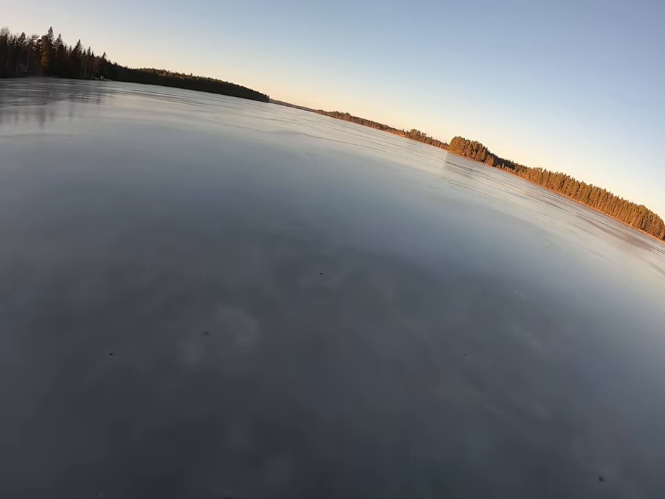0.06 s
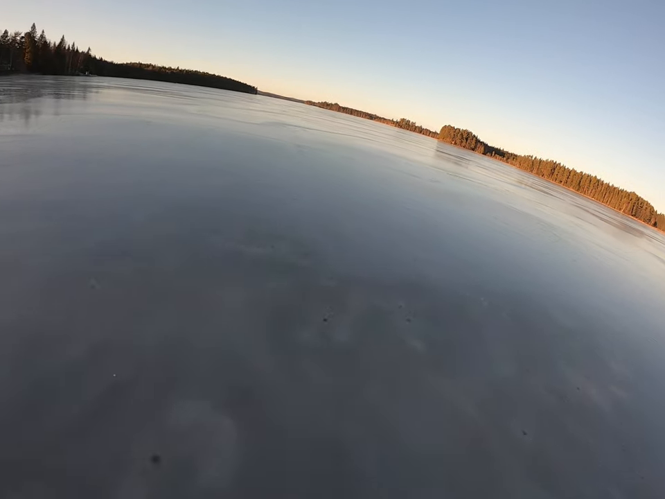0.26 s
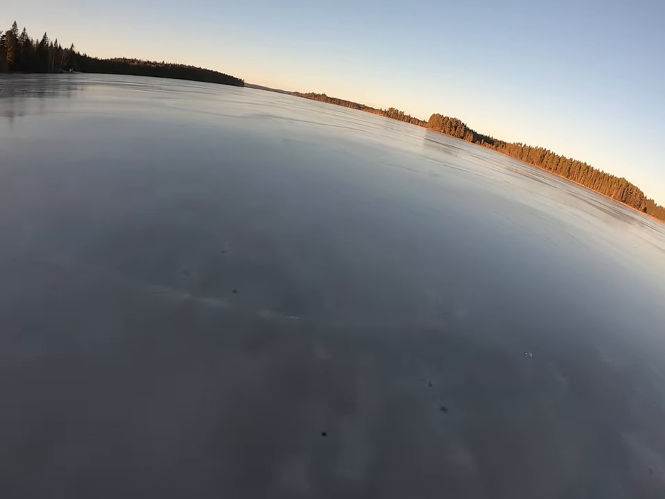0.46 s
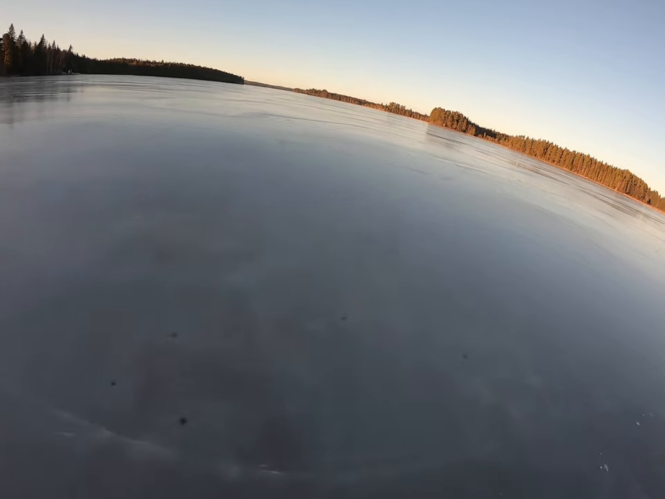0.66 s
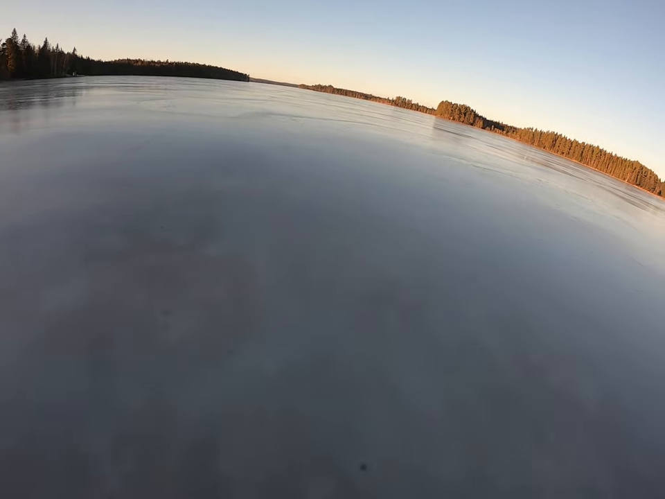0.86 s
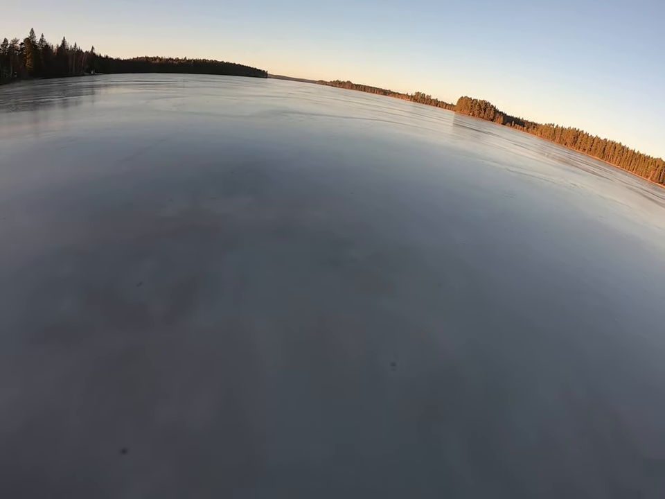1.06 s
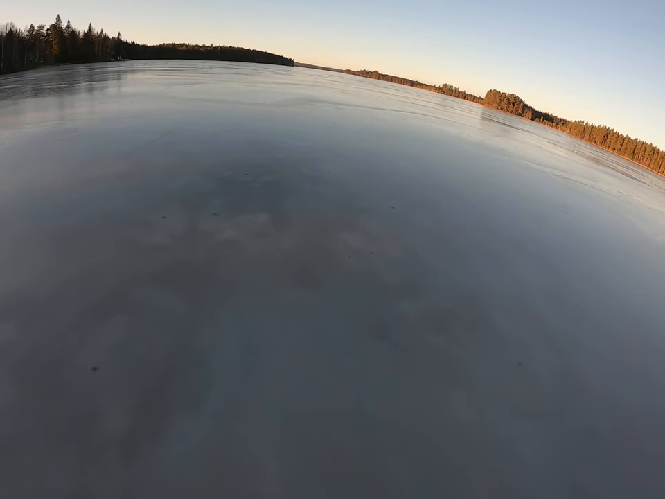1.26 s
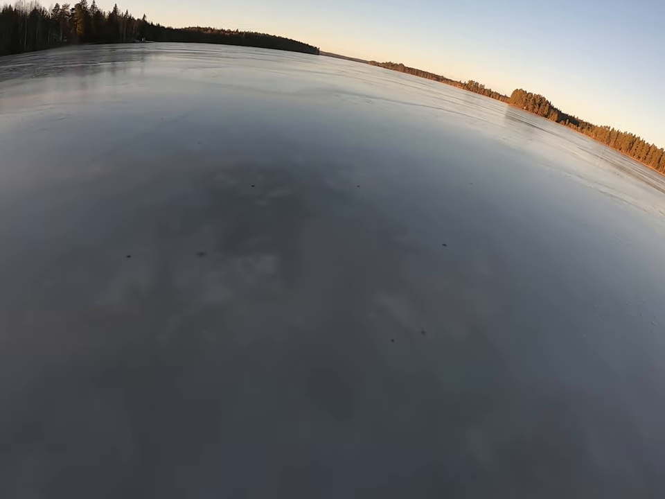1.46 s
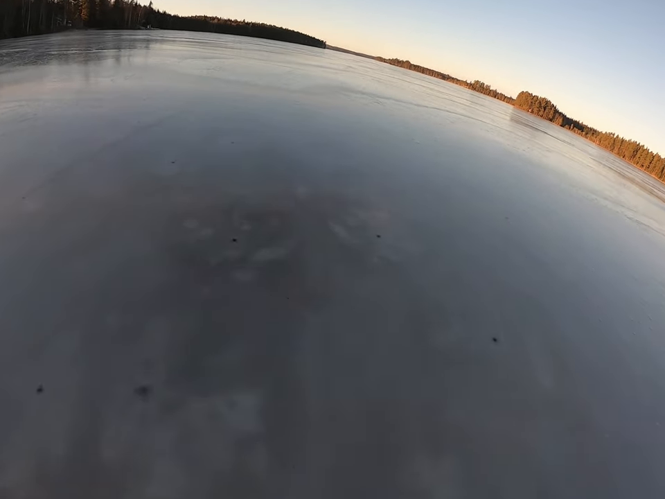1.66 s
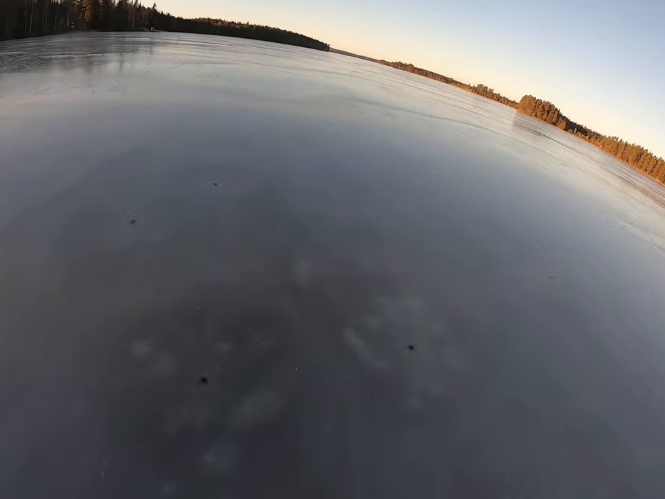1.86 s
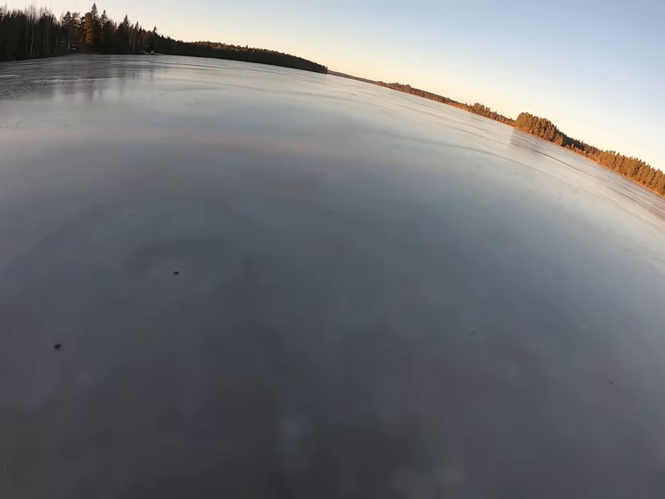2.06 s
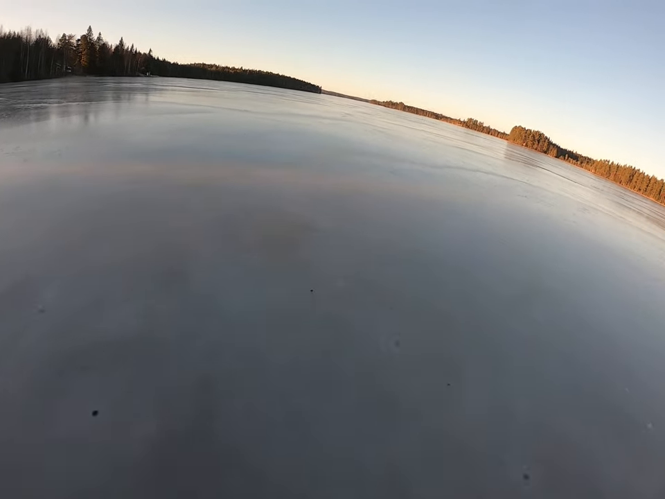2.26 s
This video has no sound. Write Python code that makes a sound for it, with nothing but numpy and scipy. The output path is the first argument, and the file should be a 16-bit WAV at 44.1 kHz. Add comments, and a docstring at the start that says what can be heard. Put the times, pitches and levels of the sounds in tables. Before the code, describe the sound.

Ice skates clack down and glide over lake ice in two scraping, rumbling strokes.

```python
"""Two skating strokes on the bare ice of a lake, heard from the skater's body.
Over faint air and low wind a binding rattles; then the first blade clacks down and glides, driving
the ice into a rumble and a hollow roar while its edge scrapes and cracks off brittle chips.
After this stroke a lifted blade snaps back against its boot and its spring rings.
The second stroke follows with a thin singing, further knocks and rattling bindings."""
import sys
import numpy as np
from scipy import signal
from scipy.fft import rfft, irfft, next_fast_len
from scipy.io import wavfile
from scipy.ndimage import map_coordinates

SR = 44100
rng = np.random.default_rng(int(sys.argv[2]) if len(sys.argv) > 2 else 0)


def dump_mix(stems):
    """Bounce the given channels to the path in sys.argv[1] as a 16-bit WAV at rate SR."""
    frames = np.atleast_2d(stems).T  # one column per channel
    limited = np.clip(frames, -1, 1)  # hard clip at full scale
    pcm = np.round(limited * 32767).astype(np.int16)
    wavfile.write(sys.argv[1], SR, pcm)


N = 102047

# Envelopes of the background air and the wind's buffeting (t/s, level/dB)
AIR_ENVELOPE = [(0, -46), (.2, -46.5), (.31, -48), (1.22, -47), (1.27, -47.5), (1.39, -48.5), (1.5, -45),
                (2.3, -41.5)]
WIND_ENVELOPE = [(0.0, -39.5), (0.2, -54), (0.24, -48), (0.84, -30), (0.97, -41), (1.48, -36.5),
                 (1.49, -29), (2.05, -50), (2.15, -49), (2.31, -46)]
# Envelopes of the edge's scrape in each stroke and of the blade's singing (t/s, level/dB)
FIRST_SCRAPE_ENVELOPE = [(.33, -48), (.385, -37), (.415, -30.5), (.45, -42.5), (.55, -43), (.66, -35),
                         (.72, -36), (.86, -40), (.98, -44), (1.05, -46.5), (1.2, -48.5)]
SECOND_SCRAPE_ENVELOPE = [(1.39, -66), (1.435, -32), (1.48, -52), (1.53, -45), (1.6, -38.5), (1.66, -34),
                          (1.76, -52), (1.88, -45), (1.91, -60), (2.02, -47.5), (2.07, -42), (2.15, -40.5),
                          (2.2, -60), (2.24, -32.5), (2.27, -60), (2.31, -57)]
SING_ENVELOPE = [(1.5, -65), (1.66, -44), (1.74, -45.5), (1.81, -38.5), (1.9, -44), (2.0, -57), (2.2, -65)]
# Envelopes of the ice's rumble and the gliding blade's roar (t/s, relative level/dB)
RUMBLE_ENVELOPE = [(0.0, -32.5), (0.07, -56), (0.17, -45.5), (0.29, -57.5), (0.34, -36.5), (0.4, -29.5),
                   (1.13, -33.5), (1.19, -42.5), (1.42, -45), (1.46, -34.5), (1.67, -29), (2.25, -32.5),
                   (2.31, -64)]
ROAR_ENVELOPE = [(0.11, -71), (0.15, -48), (0.19, -73), (0.33, -56.5), (0.42, -29.5), (0.48, -28),
                 (0.54, -31), (0.66, -28), (0.74, -31.5), (0.88, -29), (0.95, -26), (1.02, -27.5),
                 (1.13, -28.5), (1.18, -44.5), (1.38, -59), (1.49, -32.5), (1.66, -31.5), (1.77, -37.5),
                 (1.94, -39.5), (2.06, -39), (2.23, -30), (2.31, -66)]
# Cutoff of the roar, which climbs as a blade bites or pushes off (t/s, f/Hz)
ROAR_CUTOFF = [(.36, 1350), (.47, 1450), (.6, 1120), (.75, 725), (.92, 583), (1.05, 870), (1.14, 944),
               (1.3, 900), (1.5, 620), (1.62, 554), (1.8, 377), (2.02, 360), (2.14, 556), (2.22, 910)]

# Binding rattles (t/s, level/dB, contact time/s, ring f/Hz, low knock/dB, treble/dB)
RATTLE_HITS = [(0.037, -29, 0.0034, 2560, 5, 10.5), (0.062, -36, .002, 2230, -9, -10),
               (0.07, -33, 0.0034, 2080, -2, 6), (0.084, -33, 0.003, 2490, 0, 14),
               (0.117, -39, 0.0028, 2180, -14, 4), (0.128, -33, 0.0096, 2140, -5, 5),
               (0.149, -27, 0.003, 2580, 5, 5.5), (.16, -26, 0.0046, 2080, 2, 9),
               (0.236, -39.5, 0.002, 2250, 12, 18.5), (1.459, -27.5, 0.017, 2500, -20, -14),
               (1.486, -22, 0.0013, 2366, -18.5, -16), (1.5163, -29, 0.0015, 2150, 1.5, -3),
               (1.537, -32.5, 0.0009, 2430, -6, 4), (1.5538, -28.5, 0.0012, 2140, -14, -2.5),
               (1.584, -26, 0.0022, 2620, -1, 1.5), (1.61, -28.5, 0.002, 2260, -6, 2),
               (1.6282, -20.5, 0.0015, 2290, 1, 2), (1.709, -22, 0.00093, 2376, 6.5, 2.5),
               (1.7125, -19, 0.0031, 2516, 4.5, -2.5), (1.731, -23.5, 0.0019, 2350, 6, 2.5),
               (1.823, -27.5, 0.0016, 2200, 11, -3), (1.828, -26, 0.0017, 2120, 11, 0.5),
               (1.847, -32, 0.0018, 2550, 20, 13), (1.924, -39.5, 0.0018, 2550, 7, 19),
               (1.952, -27, 0.0012, 2510, 13.5, -2), (1.9579, -30.5, 0.0015, 2460, 14, -3),
               (1.97, -33, 0.00076, 2760, 4, -11), (1.986, -31, 0.0015, 2600, 6.5, 8.5),
               (2.026, -30, 0.0027, 2510, 14, 12), (2.0535, -18, 0.0029, 2410, 2, -6),
               (2.096, -31, 0.0027, 2070, 7, 14.5), (2.128, -21.5, 0.0027, 2546, 7.5, -4),
               (2.146, -26.5, 0.0026, 2120, -10, -4), (2.286, -32.5, 0.0036, 2660, 0, 9.5)]
# Share of a rattle's treble gain that acts at each frequency (f/Hz, share/1)
TREBLE_SHARE = [(2600, 0.046), (5500, 0.95)]
# Ice chips cracking under the edge (t/s, level/dB, f/Hz)
CHIP_CRACKS = [(0.422, -30, 2470), (0.516, -32, 2330), (0.539, -29.5, 2430), (0.5713, -22, 2430),
               (.573, -25, 1200), (0.576, -27, 3000), (.601, -29, 2400), (0.665, -18.5, 3980),
               (0.766, -33.5, 2860), (.789, -30, 2870), (0.833, -31.5, 3830), (0.875, -27.5, 3680),
               (0.9, -34, 3330), (0.913, -31, 3070), (0.946, -33.5, 3250), (0.97, -31, 3660),
               (0.9843, -25.5, 3860), (1.019, -36.5, 3380), (1.08, -39.5, 3260)]
# Snaps of the lifted blade against the boot (t/s, level/dB, ring f/Hz)
SNAP_HITS = [(1.2675, -34, 2080), (1.278, -18, 2000), (1.361, -17.5, 2480), (1.4004, -39, 2400),
             (1.4142, -31, 2500)]
# Swells of the spring's ring around the snaps (t/s, level/dB, Gaussian width/s)
SPRING_SWELLS = [(1.26, -37, 0.0026), (1.27, -28, 0.002), (1.28, -30, 0.0038), (1.3415, -37, 0.0019),
                 (1.352, -28, 0.0016), (1.362, -25, 0.0029), (1.402, -35.5, 0.0018)]
# A blade landing or knocking on a bump (t/s, level/dB, ring f/Hz, contact time/s)
CLACK_HITS = [(0.2706, -14.5, 2130, 0.0022), (0.272, -21.5, 3130, 0.003), (0.343, -14.5, 1590, 0.0022),
              (0.348, -24, 1500, 0.0063), (.372, -16, 1965, 0.00056), (0.3739, -18, 1364, 0.00092),
              (0.385, -21.5, 1900, 0.0011), (0.386, -18, 1360, 0.005), (.393, -33, 2940, 0.001),
              (0.412, -23, 1360, 0.0054), (0.4619, -26.5, 2240, 0.0028), (1.6445, -18, 1630, 0.0016),
              (1.6474, -17, 1500, 0.0058), (2.175, -20.5, 1680, 0.0038), (2.218, -26.5, 1730, 0.0032),
              (2.226, -25.5, 2010, 0.0066)]
# Normal modes of the steel blade (f/Hz, relative level/dB)
STEEL_MODES = [(3120, 6), (3740, 4), (4050, 0), (4600, -2.5), (5520, -10.5), (7550, -15), (8400, -13.5),
               (9200, -14.5)]

# Spectra of the sustained noises (f/Hz, relative level/dB)
AIR_SPECTRUM = [(20, 6.5), (70, 6.5), (150, 1.5), (350, -16), (650, -17.5), (1200, -17.5), (2200, -30),
                (3600, -46), (5000, -44), (6200, -25.5), (8000, -52), (9800, -32), (11300, -52),
                (15000, -66)]
WIND_SPECTRUM = [(15, -5.5), (30, -8), (60, 1.5), (95, -4), (170, -17), (600, -74)]
FIRST_SCRAPE_SPECTRUM = [(400, -12), (1200, 8), (1900, 0), (2400, 7.5), (3000, 3.5), (3800, 3.5),
                         (5000, -5.5), (6500, -13), (8200, -18), (9600, -20), (11500, -36), (15000, -54)]
SECOND_SCRAPE_SPECTRUM = [(400, -24), (900, -6), (1500, -9.5), (2000, -2.5), (2400, -4), (3000, -6),
                          (3700, -19), (4700, -23), (6500, -33), (8400, -34), (9500, -30.5), (11200, -52),
                          (15000, -57)]
SING_SPECTRUM = [(700, -26), (1150, -6), (1400, 23), (1650, 18), (2000, 19.5), (2500, -34), (4000, -32),
                 (12000, -76)]
RUMBLE_SPECTRUM = [(40, -11), (80, -5), (120, -1.5), (200, -1.5), (300, -6), (480, -22), (1200, -69)]
ROAR_SPECTRUM = [(30, -52), (90, -25), (150, -13), (250, -0.5), (350, 0), (500, -1), (700, -3.5),
                 (1500, -4), (5000, -7), (15000, -39)]
# Tone colours of the rattles, chips, snaps and clacks, most with a thin microphone resonance
# near 9.5 kHz (f/Hz, relative level/dB)
RATTLE_COLOUR = [(300, -22), (650, -18), (1000, -5.5), (1500, -8.5), (1900, -8), (2500, -2.5), (2900, -10),
                 (3300, -5.5), (4200, -23), (5000, -17.5), (7500, -36), (8600, -46.5), (9600, -34),
                 (11300, -51), (15000, -67)]
CHIP_COLOUR = [(500, -13), (1050, -6.5), (1700, -9.5), (2600, 2), (4000, -2.5), (5200, -9.5), (7200, -33.5),
               (9500, -25), (11500, -47), (15000, -65)]
SNAP_COLOUR = [(400, -35), (650, -22.5), (950, -8), (1250, -14), (1900, 6), (2700, 6), (3500, -3.5),
               (4600, -12.5), (7000, -44), (8650, -22), (10000, -42), (12000, -67)]
CLACK_COLOUR = [(300, -19.5), (700, -19.5), (1050, -28), (1400, 2), (2000, -4.5), (2600, -1.5),
                (3200, -6.5), (4200, -16), (5500, -22), (7000, -23.5), (8400, -42), (9400, -30),
                (11300, -56), (15000, -57)]

HIT_T = np.arange(4096) / SR  # time axis of one impact
HIT_HZ = np.fft.rfftfreq(len(HIT_T), 1 / SR)
TOP_HZ = 15300


def amp(db):
    """Amplitude ratio of a level in decibels."""
    return 10 ** (np.asarray(db) / 20)


def unit(x):
    """Normalisation to rms 1."""
    return x / np.sqrt(np.mean(x ** 2) + 1e-20)


def unit_hit(x):
    """Normalisation of an impact to the energy of 5 ms at rms 1."""
    return unit(x) * np.sqrt(.005 * SR / len(HIT_T))


def along(points, hz):
    """Interpolation of (f/Hz, value) points on a logarithmic frequency axis."""
    f, values = np.transpose(points)
    return np.interp(np.log(hz + 1), np.log(f + 1), values)


def curve(points):
    """Linear interpolation of (t/s, value) points at every sample."""
    return np.interp(np.arange(N) / SR, *np.transpose(points))


def wobble(knots_per_s):
    """Smooth random modulation: a spline through Gaussian values."""
    return map_coordinates(rng.standard_normal(4096), [np.arange(N) * knots_per_s / SR], mode="wrap")


def filtered(x, response):
    """Linear filtering: the spectrum is multiplied by a frequency response."""
    size = next_fast_len(N + SR // 2)
    return irfft(rfft(x, size) * response(np.fft.rfftfreq(size, 1 / SR)), size)[:N]


def noise(spectrum, grain_db=0):
    """Source and filter: white noise in millisecond grains is shaped by a spectrum; rms 1."""
    drive = rng.standard_normal(N) * amp(grain_db * wobble(700))
    return unit(filtered(drive, lambda hz: amp(along(spectrum, hz))))


def resonance(centre_hz, half_width_hz):
    """Lorentzian outline of a resonance, 1 at its centre."""
    return 1 / (1 + ((HIT_HZ - centre_hz) / half_width_hz) ** 2)


def hardness_db(db):
    """Harder contacts excite more treble: the top octave rises with level above -25 dB."""
    return max(db + 25, 0) * resonance(13000, 2600)


def contact(colour_db, contact_s, click, tail_db, tail_s):
    """Impact excitation: an impulse, a gritty burst and a faint tail drive a minimum-phase filter."""
    size = len(HIT_T)
    cepstrum = irfft(np.log(amp(colour_db)))
    cepstrum[1:size // 2] *= 2  # folding the cepstrum makes the response causal
    cepstrum[size // 2 + 1:] = 0
    response = np.exp(rfft(cepstrum))

    def ring(drive):
        """Forced response of the filter, rms 1."""
        return unit(irfft(rfft(drive) * response))

    grit = rng.standard_normal((2, size))
    age = HIT_T / contact_s
    impulse = ring(1. * (HIT_T == 0))
    crunch = ring(grit[0] * age * np.exp(-1.5 * age))
    tail = ring(grit[1] * (1 - np.exp(-age)) * np.exp(-HIT_T / tail_s))
    return unit_hit(unit(click * impulse + crunch) + amp(tail_db) * tail)


def ping(hz, decay_s):
    """Damped oscillation: one struck mode builds up quickly and decays exponentially."""
    attack = 1 - np.exp(-HIT_T / 0.0009)
    return unit_hit(np.sin(2 * np.pi * hz * HIT_T) * attack * np.exp(-HIT_T / decay_s))


def steel(decay_cycles=28, spread_db=4, detune=.008):
    """Modal superposition: each contact point favours different modes of the blade."""
    ring = np.zeros(len(HIT_T))
    for hz, db in STEEL_MODES:
        strength, shift = rng.standard_normal(2)
        ring += amp(db + spread_db * strength) * ping(hz * (1 + detune * shift), decay_cycles / hz)
    return unit_hit(ring)


def add(track, start_s, sound):
    """Superposition of a sound on the track."""
    part = track[max(round(start_s * SR), 0):][:len(sound)]
    part += sound[:len(part)]


def air():
    """Ambient noise: a faint broadband rush whose level wavers."""
    return amp(curve(AIR_ENVELOPE) + 1.3 * wobble(32)) * noise(AIR_SPECTRUM, grain_db=4.0)


def wind():
    """Turbulent pressure fluctuations: wind buffets the microphone at low frequencies."""
    return amp(curve(WIND_ENVELOPE)) * noise(WIND_SPECTRUM)


def rattles():
    """Impacts across a clearance: play in the bindings gives chatter and a ring over a lower knock."""
    out = np.zeros(N)
    for start_s, db, contact_s, hz, knock_db, treble_db in RATTLE_HITS:
        colour_db = along(RATTLE_COLOUR, HIT_HZ) + 8 * resonance(hz, 210) + hardness_db(db)
        colour_db += knock_db * resonance(960, 340) + treble_db * along(TREBLE_SHARE, HIT_HZ)
        chatter = contact(colour_db, contact_s, click=0.24, tail_db=-10, tail_s=0.0094)
        add(out, start_s, amp(db) * (chatter + amp(-7) * ping(hz, 0.0042) + amp(-17) * steel()))
    return out


def chips(mean_gap_s=.004, splinter_cap_db=-31, loss_db=1.5):
    """Brittle fracture: ice cracks under the loaded edge, and three ever weaker splinters follow."""
    out = np.zeros(N)
    for start_s, db, hz in CHIP_CRACKS:
        colour_db = along(CHIP_COLOUR, HIT_HZ) + 4 * resonance(hz, 600) + hardness_db(db)
        crack = contact(colour_db, contact_s=0.0017, click=0.65, tail_db=-6.5, tail_s=0.003)
        add(out, start_s, amp(db) * crack)
        delays = np.cumsum(rng.exponential(mean_gap_s, size=3))
        for k, delay_s in enumerate(delays, start=1):
            splinter = contact(colour_db, contact_s=.001, click=1, tail_db=-8, tail_s=0.003)
            add(out, start_s + delay_s, amp(min(db, splinter_cap_db) - loss_db * k) * splinter)
    return out


def snaps():
    """Impulsive excitation: the lifted blade shuts against its boot with a dry click."""
    out = np.zeros(N)
    for start_s, db, hz in SNAP_HITS:
        colour_db = along(SNAP_COLOUR, HIT_HZ) + 4 * resonance(hz, 400)
        snap = contact(colour_db, contact_s=.0012, click=5.5, tail_db=-9, tail_s=0.002)
        add(out, start_s, amp(db) * snap)
    return out


def spring(ring_hz=4080, wander_hz=95):
    """Narrow-band vibration: the blade's spring rings thinly in brief swells around the snaps."""
    t = np.arange(N) / SR
    swell = sum(amp(db) * np.exp(-.5 * ((t - peak_s) / width) ** 2) for peak_s, db, width in SPRING_SWELLS)
    hz = ring_hz + wander_hz * wobble(810)
    return swell * np.sin(2 * np.pi * np.cumsum(hz) / SR)


def clacks():
    """Free vibration after impact: a blade strikes the ice; the higher its ring, the weaker its lows."""
    out = np.zeros(N)
    for start_s, db, hz, contact_s in CLACK_HITS:
        low_cut_db = 7 * np.clip(np.log2((HIT_HZ + 1) / hz), -1, 0)
        colour_db = along(CLACK_COLOUR, HIT_HZ) + low_cut_db + hardness_db(db) + 5 * resonance(hz, 220)
        crunch = contact(colour_db, contact_s, click=0.2, tail_db=-10, tail_s=0.0085)
        clack = amp(-4) * crunch + amp(-3.5) * ping(hz, 0.0016) + amp(-14) * steel()
        add(out, start_s, amp(db) * clack)
    return out


def crackle(spectrum, base_rate_per_s=800, clump_db=5, spread_db=3):
    """Shot noise: tiny fractures arrive at a fluctuating rate and so form clumps; rms 1."""
    crowding = amp(clump_db * wobble(160))
    happens = rng.random(N) < crowding * base_rate_per_s / SR
    strength = rng.choice([-1, 1], N) * amp(spread_db * rng.standard_normal(N))
    return unit(filtered(happens * strength, lambda hz: amp(along(spectrum, hz))))


def singing():
    """Band-limited noise: the blade sings thinly in the second stroke."""
    return amp(curve(SING_ENVELOPE)) * noise(SING_SPECTRUM)


def scrape(envelope, spectrum, flutter_db=2.0):
    """Sliding friction: a steel edge shaves the ice with a fluttering hiss full of tiny fractures."""
    shaving = unit(noise(spectrum, grain_db=2.5) + amp(1) * crackle(spectrum))
    return amp(curve(envelope) + flutter_db * wobble(130)) * shaving


def glide(filter_order=3.17, surge_db=1.0):
    """Roughness excitation: uneven ice shakes blade and sheet; a roar over a rumble brightens with bite."""
    hz, t, frames = signal.stft(noise(ROAR_SPECTRUM, grain_db=1.5), SR, nperseg=512)
    cutoff_hz = np.interp(t, *np.transpose(ROAR_CUTOFF))
    low_pass = 1 / np.sqrt(1 + (hz[:, None] / cutoff_hz) ** (2 * filter_order))
    roar = signal.istft(frames * low_pass, SR, nperseg=512)[1][:N]
    roar *= amp(curve(ROAR_ENVELOPE) + 5.5 + surge_db * wobble(30))
    rumble = amp(curve(RUMBLE_ENVELOPE) - 0.5) * noise(RUMBLE_SPECTRUM)
    return roar + rumble


def scene():
    """Free-field superposition: both skates sound over air and wind, and the open lake gives no echo."""
    background = air() + wind()
    sliding = glide() + singing()
    sliding += scrape(FIRST_SCRAPE_ENVELOPE, FIRST_SCRAPE_SPECTRUM)
    sliding += scrape(SECOND_SCRAPE_ENVELOPE, SECOND_SCRAPE_SPECTRUM)
    transients = clacks() + snaps() + spring() + rattles() + chips()
    return (background + sliding + transients)[None]


def record(dry):
    """Band limiting: an ideal low-pass filter removes everything above TOP_HZ."""
    return filtered(dry[0], lambda hz: hz < TOP_HZ)[None]


dry = scene()
out = record(dry)
dump_mix(out)
```